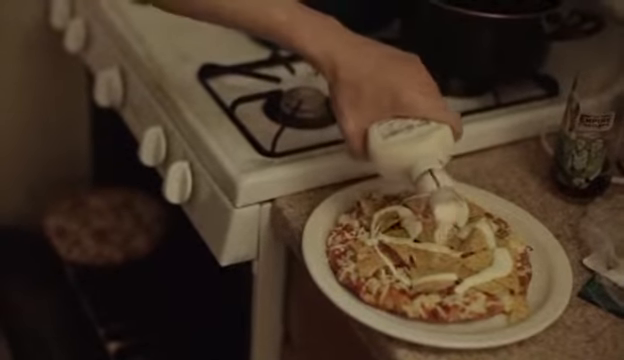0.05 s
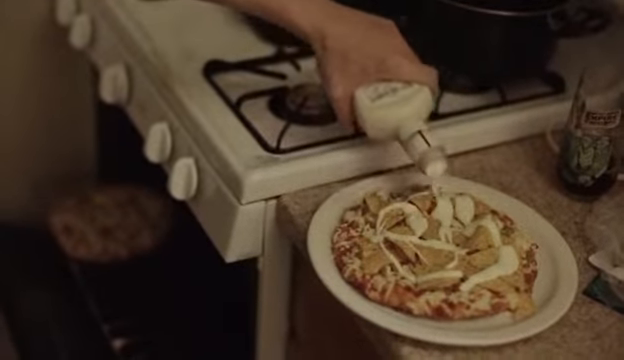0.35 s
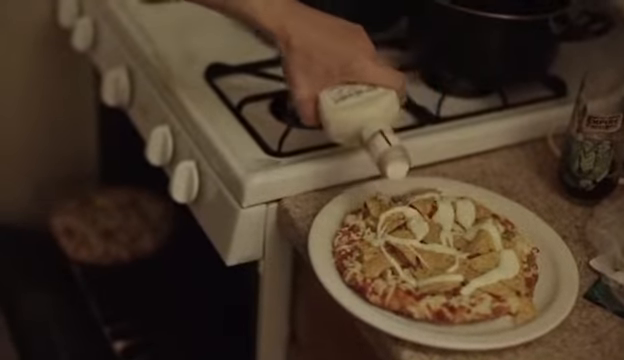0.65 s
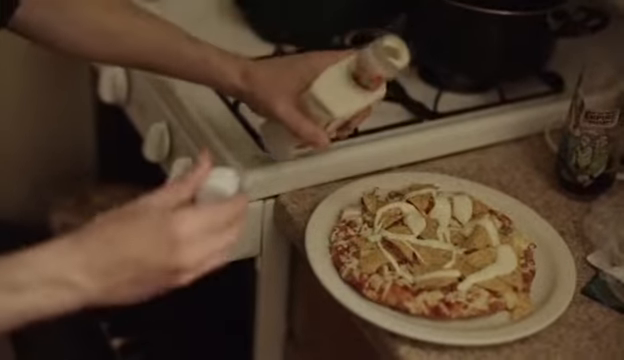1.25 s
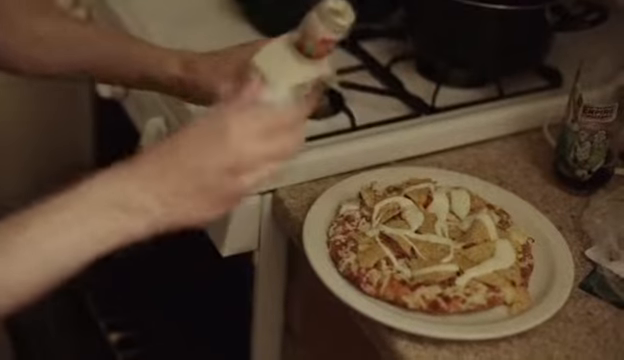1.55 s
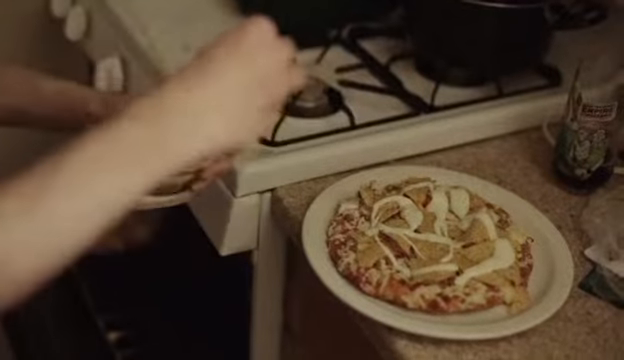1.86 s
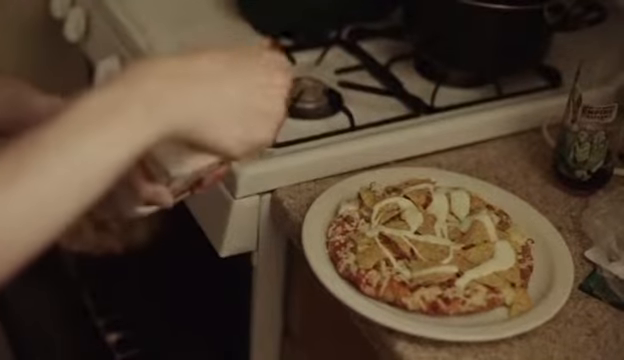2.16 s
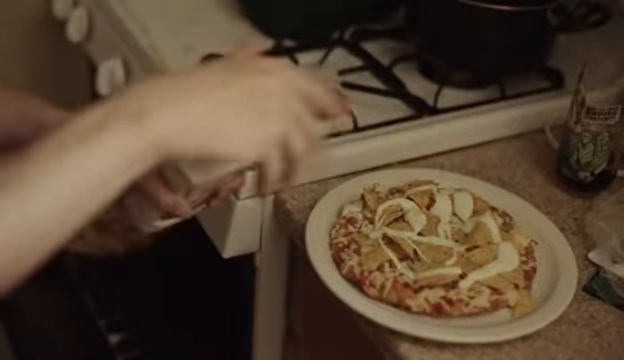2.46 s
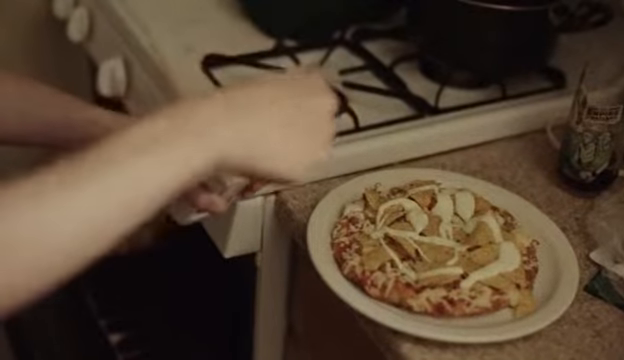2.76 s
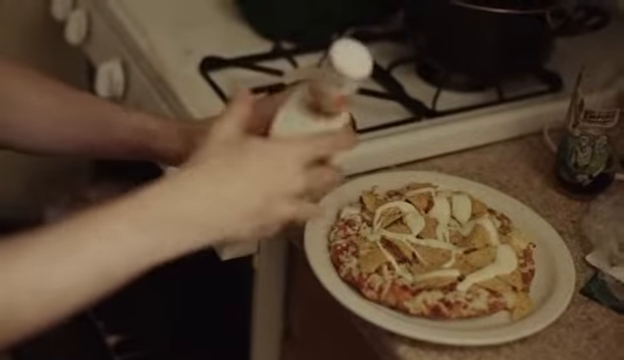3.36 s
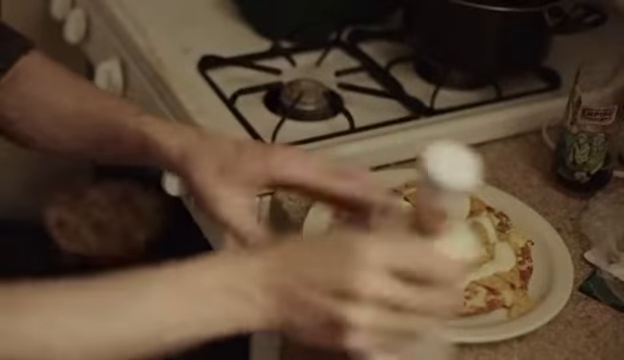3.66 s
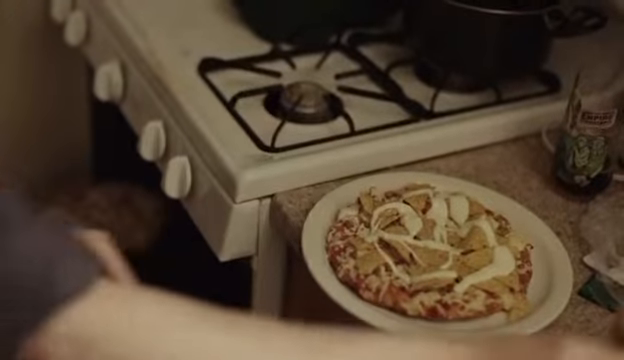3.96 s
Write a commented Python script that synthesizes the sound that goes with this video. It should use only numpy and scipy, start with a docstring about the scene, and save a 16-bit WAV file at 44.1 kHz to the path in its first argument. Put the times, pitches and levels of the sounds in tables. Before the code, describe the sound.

A plastic cap is screwed onto a bottle with small clicks, rasps and a sharp snap.

```python
"""A plastic cap is put on an upright sauce bottle and screwed down in a quiet kitchen.
It knocks on the neck, whose air sounds briefly; the thread rasps and ticks; the cap snaps tight.
Knocks are chattering impulses and rubbing is a run of tiny slips, both ringing the plastic.
Fingers squeeze and squeak; a longer, dull rub of the handled bottle precedes its landing on the counter.
Under it all: low room rumble, faint hiss and hum."""
import sys
import numpy as np
from scipy import signal
from scipy.fft import rfft, irfft
from scipy.io import wavfile
from scipy.ndimage import uniform_filter1d

SR = 44100
rng = np.random.default_rng(int(sys.argv[2]) if len(sys.argv) > 2 else 0)


def transcribe(signal):
    """Save signal, clipped to [-1, 1], as a 16-bit WAV file at the path in sys.argv[1]."""
    frames = np.atleast_2d(signal).T
    limited = np.clip(frames, -1, 1)
    pcm = np.round(limited * 32767).astype(np.int16)
    wavfile.write(sys.argv[1], SR, pcm)


N = 176400
FFT_SIZE = 4096
HZ = np.maximum(np.fft.rfftfreq(FFT_SIZE, 1 / SR), 1)


def from_db(db):
    """Decibels to gain."""
    return 10 ** (np.asarray(db) / 20)


def at_hz(points, hz):
    """Interpolate (frequency, value) points on a log-frequency axis."""
    freqs, values = np.transpose(points)
    return np.interp(np.log(np.maximum(hz, 1)), np.log(freqs), values)


def unit(x):
    """Scale to unit energy."""
    return x / np.sqrt(np.sum(x ** 2) + 1e-20)


def add(out, start_s, x):
    """Mix x into out at start_s."""
    i = int(start_s * SR)
    out[i:i + len(x)] += x[:max(N - i, 0)]


def click(spectrum_db):
    """Minimum-phase impulse with this spectrum."""
    cepstrum = irfft(np.log(from_db(spectrum_db)))
    cepstrum[1:FFT_SIZE // 2] *= 2
    cepstrum[FFT_SIZE // 2 + 1:] = 0
    return irfft(np.exp(rfft(cepstrum)))


def resonances(rows):
    """Summed lift of resonance peaks in dB."""
    return sum(lift_db / (1 + (2 * (HZ - hz) / width_hz) ** 2) for hz, width_hz, lift_db in rows)


def steady_noise(spectrum_db):
    """Shaped noise, rms 1."""
    return np.sqrt(N) * unit(irfft(rfft(rng.standard_normal(N)) * from_db(spectrum_db), N))


def touch(chatter_gain=1.0, decay_s=.00067):
    """A first contact plus the brief chatter of the edges."""
    t = np.arange(FFT_SIZE) / SR
    chatter = chatter_gain * unit(rng.standard_normal(FFT_SIZE) * np.exp(-t / decay_s))
    chatter[0] += 1
    spectrum = rfft(chatter)
    flattened = spectrum / np.sqrt(np.abs(spectrum))
    return unit(irfft(flattened)[:FFT_SIZE // 2])


def friction(length_s, fade_s=.002, slips_per_s=2500, spread_db=4.5):
    """Tiny slips of uneven size, faded in and out."""
    t = np.arange(SR // 4) / SR
    slips = (rng.random(len(t)) < slips_per_s / SR) * rng.choice([-1, 1], len(t))
    sizes = from_db(spread_db * rng.standard_normal(len(t)))
    envelope = np.clip(np.minimum(t, length_s - t) / fade_s, 0, 1)
    return unit(slips * sizes * envelope)


# Rumble and hiss spectrum: (frequency [Hz], relative density [dB])
FLOOR_SPECTRUM = [(20, -14), (40, -13), (60, 2), (78, 1), (100, -2.5), (140, -2.5), (250, -5), (500, -14),
                  (1000, -16.5), (2000, -19.5), (5000, -22), (15500, -19)]
# Their stereo width: (frequency [Hz], side gain [dB])
FLOOR_SIDE = [(30, -5), (100, -13.5), (500, -26), (2000, -37), (12000, -35)]
# Hum bands: (frequency [Hz], level [dB])
HUM_BANDS = [(59, -73), (77, -72), (138, -72.5)]
def background(floor_db=-61, hum_half_width_hz=3.2):
    """Steady rumble and hiss; narrow noise bands make a wavering hum."""
    hz = np.fft.rfftfreq(N, 1 / SR)
    mid, side = (from_db(floor_db) * steady_noise(at_hz(FLOOR_SPECTRUM, hz)) for _ in range(2))
    side = irfft(rfft(side) * from_db(at_hz(FLOOR_SIDE, hz)), N)
    hum = sum(from_db(db) * steady_noise(-20 * np.log10(1 + ((hz - centre) / hum_half_width_hz) ** 2))
              for centre, db in HUM_BANDS)
    return mid + hum + side * np.array([[1], [-1]])


# Kitchen decay: (frequency [Hz], T60 [s])
ROOM_DECAY = [(150, 0.44), (400, 0.62), (1000, 0.42), (2700, 0.36), (7000, 0.25), (15000, .18)]
# Reflections off counter and stove: (delay [s], relative gain [linear])
REFLECTIONS = [(.0038, 0.31), (.0052, .6), (.0068, .35), (0.0142, .3)]
def kitchen(x, wet_db=0, tail_db=6, onset_s=.0036, early_lift=.56, early_s=.014, echo_cut_hz=10600):
    """Direct sound, reflections and a tail that dies sooner in the treble, drawn anew per call."""
    t = np.arange(SR // 2) / SR
    white, hz = rfft(rng.standard_normal(len(t))), np.fft.rfftfreq(len(t), 1 / SR)
    white /= np.sqrt(uniform_filter1d(np.abs(white) ** 2, size=100))
    centres, t60s = np.transpose(ROOM_DECAY)
    bands = [irfft(white * at_hz(list(zip(centres, share)), hz), len(t)) for share in np.eye(len(t60s))]
    tail = sum(band * from_db(-60 * t / t60) for band, t60 in zip(bands, t60s))
    envelope = np.minimum(t / onset_s, 1) * (1 + early_lift * np.exp(-t / early_s))
    response = from_db(tail_db) * unit(tail * envelope)
    echo = click(-10 * np.log10(1 + (HZ / echo_cut_hz) ** 2))
    for delay_s, gain in REFLECTIONS:
        add(response, delay_s, gain * echo)
    response *= from_db(wet_db)
    response[0] += 1
    return signal.fftconvolve(x, response)


# Knock of the base: (frequency [Hz], relative level [dB])
BASE_SPECTRUM = [(150, 4), (500, 2), (900, 6.5), (1200, -6.5), (1750, 1), (3000, -12.5), (7000, -17),
                 (14000, -28)]
# Counter modes: (frequency [Hz], level [dB], T60 [s])
COUNTER_MODES = [(140.6, -22.5, 0.4), (507, -35, 0.11)]
def landing(start_s=3.9872, knock_db=-5.5, boom_lag_s=.0063, low_cut_hz=70):
    """The base knocks on the counter, whose modes boom just after."""
    out, t = np.zeros(N), np.arange(FFT_SIZE) / SR
    add(out, start_s, from_db(knock_db) * kitchen(click(at_hz(BASE_SPECTRUM, HZ))))
    boom = sum(from_db(db - 60 * t / t60) * np.sin(2 * np.pi * hz * t) for hz, db, t60 in COUNTER_MODES)
    highpass = signal.butter(1, low_cut_hz, "high", fs=SR, output="sos")
    add(out, start_s + boom_lag_s, -signal.sosfilt(highpass, boom))
    return out


def finger_squeak(start_s=3.648, length_s=.03, centre_hz=6700, width_hz=450, gain_db=-71):
    """Skin slips on plastic in one thin, high band."""
    out = np.zeros(N)
    band = click(-20 * np.log10(1 + (2 * (HZ - centre_hz) / width_hz) ** 2))
    squeak = unit(signal.fftconvolve(friction(length_s), band)) * np.sqrt(length_s * SR)
    add(out, start_s, kitchen(from_db(gain_db) * squeak))
    return out


# Anchors of each contact spectrum: (frequency [Hz])
BANDS_HZ = [250, 700, 1700, 4500, 11000]
# Bottle and cap resonances: (frequency [Hz], width [Hz], lift [dB])
BODY_RESONANCES = [(294, 54, 1.5), (470, 200, 1.5), (836, 130, 2.5), (1345, 61, 2.5), (1722, 147, 7),
                   (2450, 71, 0), (3420, 290, 2.5), (6050, 790, 4.5), (9100, 1400, 2)]
def plastic(force, bands_db, low_cut_hz=160, high_cut_hz=12000):
    """A contact force, coloured by its own spectrum and the body's resonances."""
    contact_db = at_hz(list(zip(BANDS_HZ, bands_db)), HZ)
    rolloff_db = 10 * np.log10((1 + (low_cut_hz / HZ) ** 4) * (1 + (HZ / high_cut_hz) ** 8))
    return signal.fftconvolve(force, click(contact_db - rolloff_db + resonances(BODY_RESONANCES)))


# Short plastic rubs: (time [s], length [s], relative level at each of BANDS_HZ [dB])
SHORT_RUBS = [(.145, 0.021, -28, -22.5, -28, -48, -47), (.298, 0.0405, -11.5, -19.5, -24, -28, -34.5),
              (1.292, 0.0076, -27, -27, -28, -33, -38), (1.309, 0.0114, -13, -14, -17.5, -16, -25.5),
              (1.955, 0.014, -20, -23.5, -23.5, -36, -31), (2.296, .016, -11, -16, -18, -19, -23.5),
              (2.405, .015, -18, -31, -28.5, -37, -43), (2.686, 0.011, -5.5, -16.5, -8.5, -23, -21.5),
              (2.775, 0.0119, -25, -11, -25.5, -39, -31), (3.042, .015, -1, -8, -16, -40, -18),
              (3.319, .013, -9.5, -12.5, -16, -16.5, -24.5), (3.492, 0.026, -24, -18, -25, -28.5, -29),
              (3.602, .012, -23, -24, -26.5, -27.5, -35)]
def short_rubs(gain_db=-5):
    """Hand squeezes and brief scrapes of the cap's thread excite the plastic."""
    out = np.zeros(N)
    for start_s, length_s, *bands_db in SHORT_RUBS:
        add(out, start_s, kitchen(plastic(friction(length_s), bands_db)))
    return from_db(gain_db) * out


def neck_pop(start_s=1.794, pitch_hz=562, gain_db=-46, rise_s=.011, length_s=.024):
    """The air in the neck sounds a hollow note as the cap covers it."""
    out, t = np.zeros(N), np.arange(FFT_SIZE) / SR
    swell = np.interp(t, [0, rise_s, length_s], [0, 1, 0]) ** .5
    note = swell * np.sin(2 * np.pi * pitch_hz * t)
    add(out, start_s, kitchen(note, wet_db=-12.5))
    return from_db(gain_db) * out


# Longer plastic rubs: (time [s], length [s], relative level at each of BANDS_HZ [dB])
LONG_RUBS = [(2.03, 0.045, -32, -33, -25, -40, -25), (2.155, 0.053, -17, -15, -9.5, -37, -27),
             (2.74, 0.1, -19, -16, -21, -18, -17), (3.052, 0.038, -22, -13, -18, -20, -9.5),
             (3.76, 0.18, -18, -13.5, -16, -26, -38)]
def long_rubs(gain_db=-10.5):
    """Friction excites the plastic: thread rasps up to the snap, later a dull rub of the handled bottle."""
    out = np.zeros(N)
    for start_s, length_s, *bands_db in LONG_RUBS:
        add(out, start_s, kitchen(plastic(friction(length_s, fade_s=.01), bands_db)))
    return from_db(gain_db) * out


# Thread ticks: (time [s], relative level [dB])
THREAD_TICKS = [(1.9935, -20), (2.0115, -17), (2.0218, -30), (2.1935, -23.5), (2.7357, -11.5),
                (2.795, -21.5)]
# One tick: (frequency [Hz], relative level [dB])
TICK_SPECTRUM = [(1000, -36), (4500, -24), (6800, 1), (7800, -3.5), (9000, 4.5), (10200, -0.5),
                 (13000, -0.5), (15500, -12)]
def thread_ticks(gain_db=-6.5):
    """Small contacts in the thread give dry, bright ticks."""
    out = np.zeros(N)
    for start_s, db in THREAD_TICKS:
        tick = signal.fftconvolve(touch(), click(db + at_hz(TICK_SPECTRUM, HZ)))
        add(out, start_s, kitchen(tick, wet_db=-13))
    return from_db(gain_db) * out


# Cap on neck: (time [s], relative level at each of BANDS_HZ [dB])
CAP_KNOCKS = [(1.793, -18, -14, -15, -18.5, -27), (1.823, -33, -36, -19.5, -24, -38),
              (1.862, -17, -24, -19.5, -15.5, -22.5), (2.174, -27, -17, -12.5, -23.5, -26),
              (2.237, -12.5, -10.5, -7.5, -12, -18.5), (2.249, -9.5, -13, -22, -21, -34),
              (2.267, -5, -12.5, -12, -19, -22.5), (2.595, -4, -18, -12.5, -25.5, -29.5),
              (2.6944, -8.5, -4, -4, -10, -21), (2.842, -27, -42, -16.5, -22, -34),
              (3.0226, 2, -5, -7, -10, -20), (3.487, -12.5, -16, -17.5, -23.5, -35)]
def cap_knocks(gain_db=-8):
    """The cap strikes the neck, chatters and rings the plastic."""
    out = np.zeros(N)
    for start_s, *bands_db in CAP_KNOCKS:
        add(out, start_s, kitchen(plastic(touch(), bands_db)))
    return from_db(gain_db) * out


# Snap: (frequency [Hz], relative level [dB])
SNAP_SPECTRUM = [(100, -19), (220, 2), (500, -14), (900, -7.5), (1250, 5.5), (1800, 7), (2550, 2),
                 (3100, -2.5), (5000, -4.5), (7200, -4), (10000, -10), (15000, -24)]
# Tightened cap resonances: (frequency [Hz], width [Hz], lift [dB])
CAP_RESONANCES = [(1200, 70, 6), (1390, 160, 8), (1650, 120, 8), (1895, 120, 6), (2160, 110, 4),
                  (2500, 220, 4)]
def cap_snap(start_s=3.0847, gain_db=-6.5, rebound_s=.0049, rebound_db=-4):
    """The cap snaps tight, rattles on its seat and rebounds once."""
    out = np.zeros(N)
    ring = click(at_hz(SNAP_SPECTRUM, HZ) + resonances(CAP_RESONANCES))
    for delay_s, db in ((0, 0), (rebound_s, rebound_db)):
        blow = signal.fftconvolve(touch(chatter_gain=1.5, decay_s=.004), ring)
        add(out, start_s + delay_s, from_db(db) * kitchen(blow, wet_db=-6))
    return from_db(gain_db) * out


def scene(side_db=-47.5):
    """The bottle, centred, over the background; a faint smeared side signal follows its sounds."""
    floor = background()
    cap = cap_snap() + cap_knocks() + thread_ticks()
    bottle = cap + short_rubs() + long_rubs() + neck_pop() + finger_squeak() + landing()
    diffuser = unit(rng.standard_normal(FFT_SIZE // 10))
    side = from_db(side_db) * signal.fftconvolve(bottle, diffuser)[:N]
    return floor + bottle + side * np.array([[1], [-1]])


def record(dry):
    """Steep low-pass."""
    cutoff_hz = 15800
    return signal.sosfilt(signal.ellip(12, .1, 70, cutoff_hz, fs=SR, output="sos"), dry)


dry = scene()
out = record(dry)
transcribe(out)
```